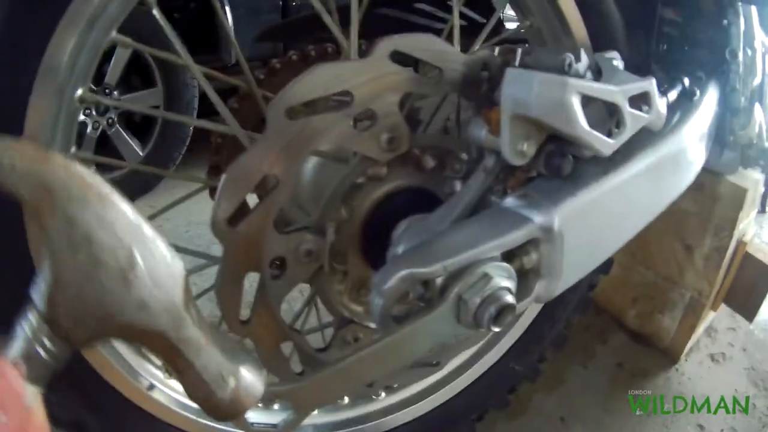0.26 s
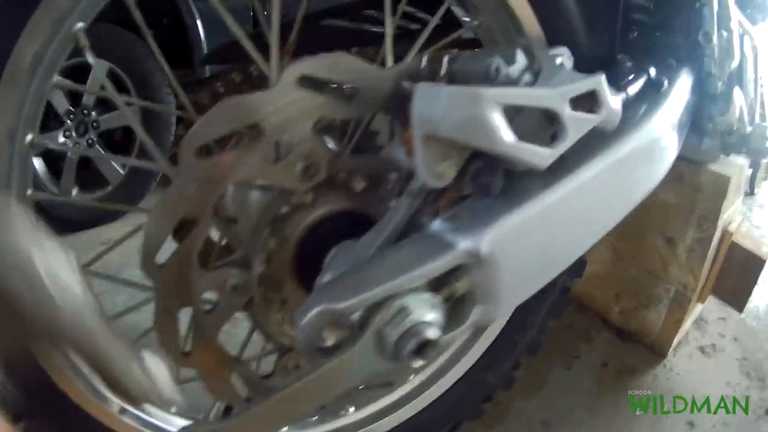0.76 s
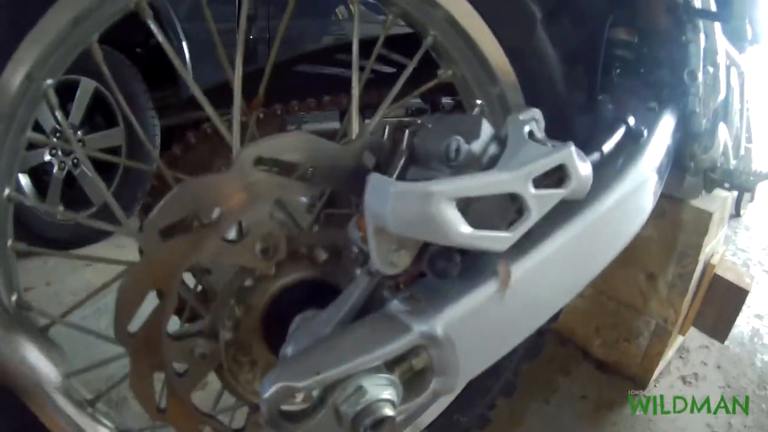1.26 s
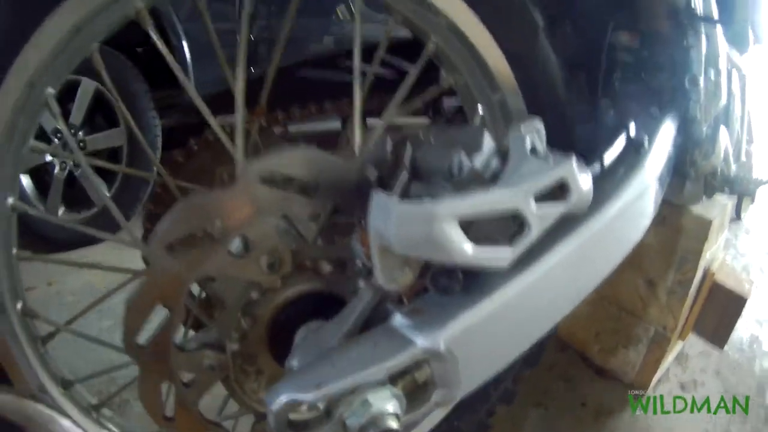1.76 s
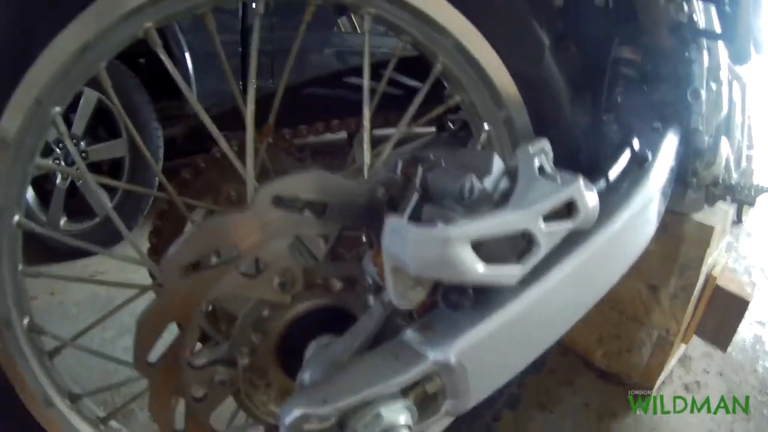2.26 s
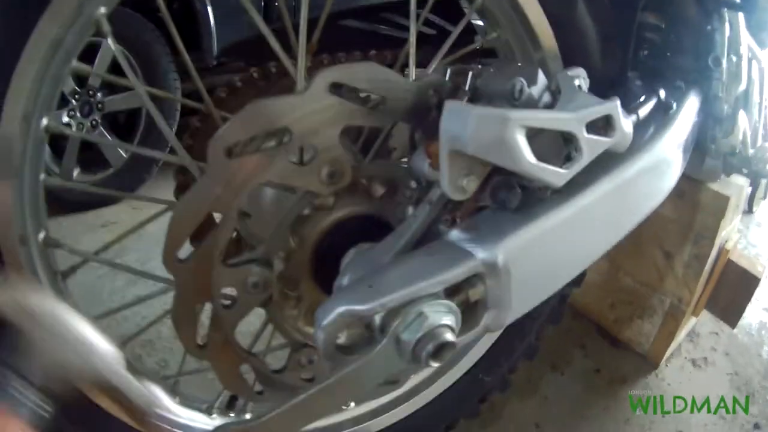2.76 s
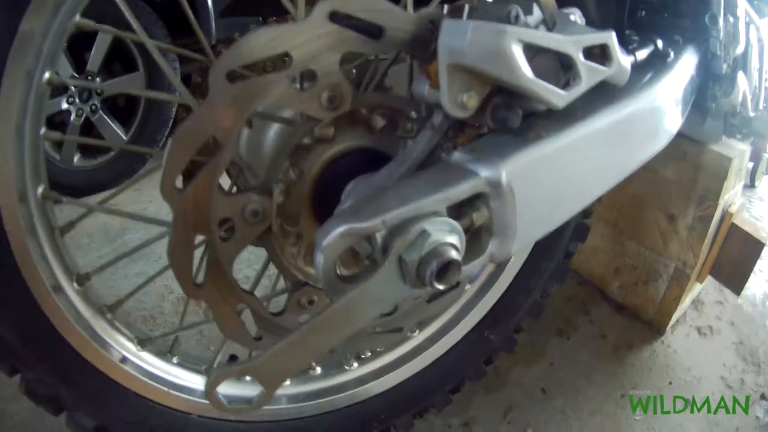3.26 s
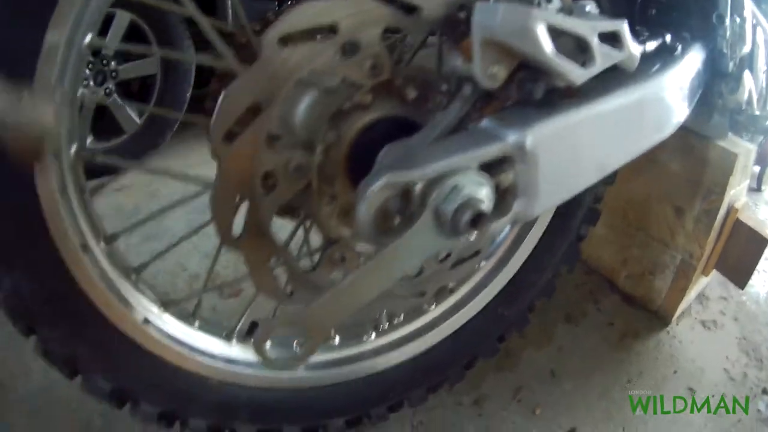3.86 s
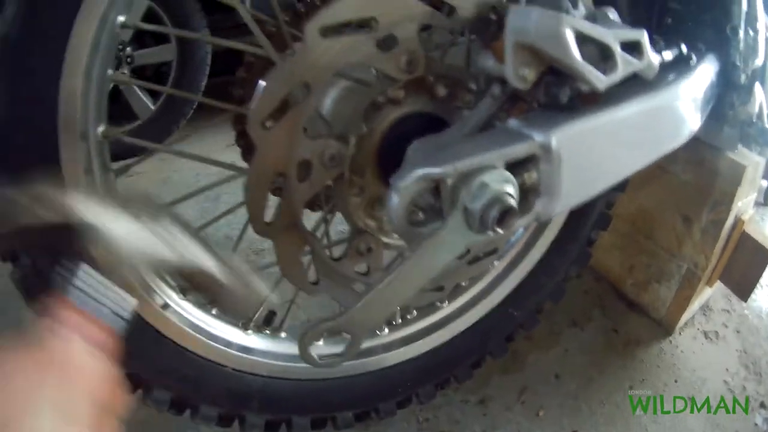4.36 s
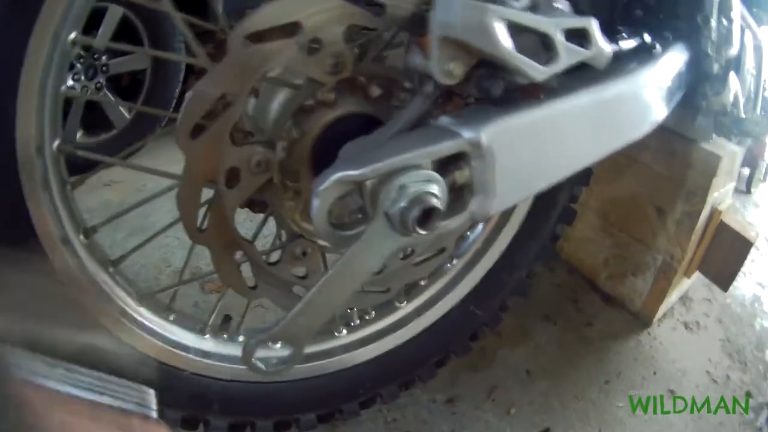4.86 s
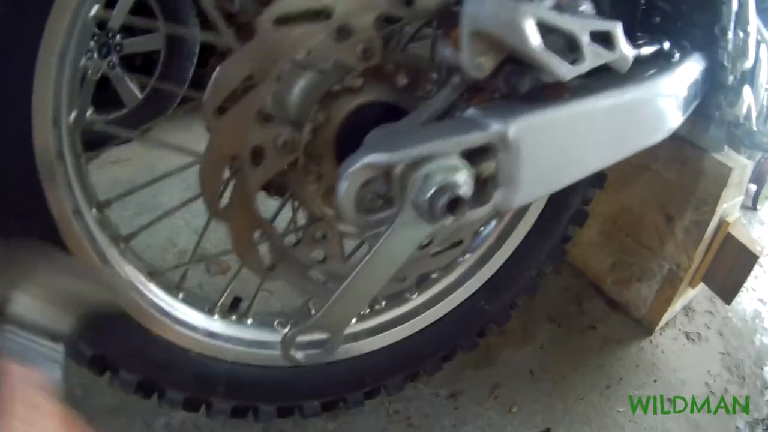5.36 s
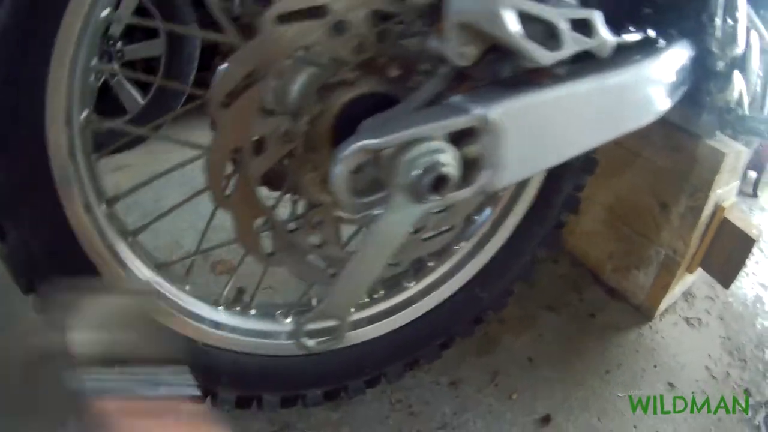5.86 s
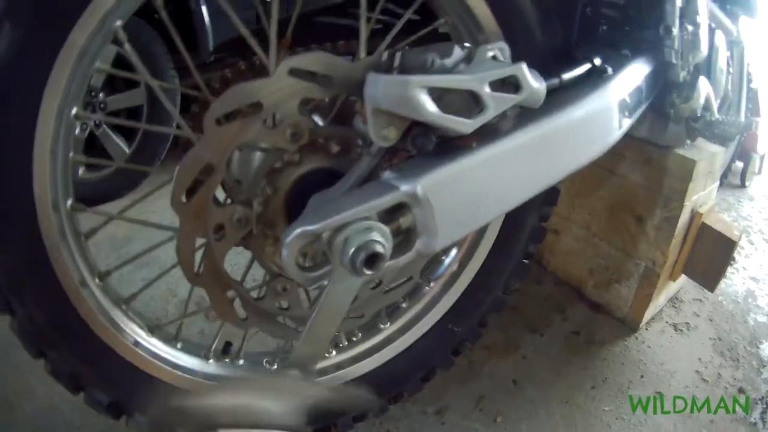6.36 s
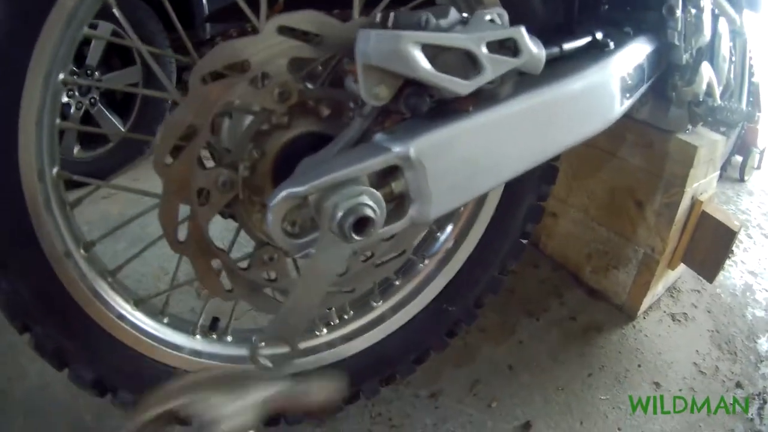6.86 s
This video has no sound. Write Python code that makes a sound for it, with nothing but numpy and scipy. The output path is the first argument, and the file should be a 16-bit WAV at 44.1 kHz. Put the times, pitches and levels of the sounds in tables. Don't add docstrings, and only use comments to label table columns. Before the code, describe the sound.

Faint cloth rustle and quiet garage air, then hammering on steel: first light, soon loud and regular, each blow a sharp clank with a brief ring and hard-walled echo. A small close camera microphone squashes the peaks, so tails hold and then drop. After the last regular blow there is a pause, then a clink, a sliding scrape, another strike and bouncing wrench clatter.

```python
import sys
import numpy as np
from scipy import signal
from scipy.fft import rfft, irfft, next_fast_len
from scipy.io import wavfile
from scipy.ndimage import uniform_filter1d, minimum_filter1d

SR = 44100
rng = np.random.default_rng(int(sys.argv[2]) if len(sys.argv) > 2 else 0)


def put_to_file(sound):
    columns = np.atleast_2d(sound).T
    safe = np.clip(columns, -1, 1)
    whole_steps = np.round(safe * 32767)
    wavfile.write(sys.argv[1], SR, whole_steps.astype(np.int16))


def volts(x):
    e = np.asarray(x, float) / 20
    return 10 ** e


N = 312713


def evened(x):
    return x / np.sqrt(np.mean(x ** 2) + 1e-20)


def read(points, hz):
    f, value = np.transpose(points)
    return np.interp(np.log(hz + 1), np.log(f + 1), value)


def columns(table):
    return np.transpose(table)[:, :, None]


def add(mix, start_s, sound):
    part = mix[round(start_s * SR):][:len(sound)]
    part += sound[:len(part)]


def coloured(spectrum, size):
    white = rfft(rng.standard_normal(size))
    shape = volts(read(spectrum, np.fft.rfftfreq(size, 1 / SR)))
    return evened(irfft(white * shape, size))


def ring(hz, db, t60, t, detune, scatter_db):
    share, shift = rng.standard_normal((2, len(hz), 1))
    level = volts(db + scatter_db * share - 60 * t / t60)
    return (level * np.sin(2 * np.pi * hz * (1 + detune * shift) * t)).sum(0)


# pitch_hz, level_db (per Hz)
AIR = [(15, -30), (40, -8.5), (65, -6), (161, -5), (476, -13), (796, -13), (2840, -29), (9570, -35),
       (12500, -29), (13600, -26.5), (16000, -30)]
# pitch_hz, level_db
WHINE = [(6857, -78), (13714, -64)]


def background():
    t = np.arange(N) / SR
    whine = sum(volts(db) * np.sqrt(2) * np.sin(2 * np.pi * hz * t) for hz, db in WHINE)
    return volts(-50) * coloured(AIR, size=N) + whine


# pitch_hz, t60_s
GARAGE = [(60, 0.23), (500, 0.43), (2000, 0.45), (5000, 0.43), (10000, 0.34), (16000, 0.26)]


def garage(x):
    hz, t, z = signal.stft(rng.standard_normal((3, SR * 3 // 4)), SR, nperseg=256)
    decay = volts(-60 * t / read(GARAGE, hz)[:, None])
    tails = signal.istft(z * decay, SR, nperseg=256)[1]
    tails = tails * (1 - np.exp(-np.arange(tails.shape[1]) / SR / 0.0037))
    turn = np.arange(N) / SR * np.pi - np.arange(3)[:, None] * np.pi / 3
    fed = x * np.cos(turn) * np.sqrt(2 / 3)
    return signal.fftconvolve(fed, tails / np.linalg.norm(tails[0]), axes=1)[:, :N].sum(0)


# pitch_hz, level_db (per Hz)
RUB_COLOUR = [(120, -34), (200, -3), (240, 4), (316, -12), (360, -8), (548, 5.5), (806, 0), (867, 2.5),
              (1450, 1.5), (2210, -3.5), (2420, 3), (3300, -5.5), (4300, -6), (6520, -12), (9750, -4),
              (16000, -13)]
# time_s, level_db
RUBS = [
    [(0.0, -48.5), (0.112, -49), (0.116, -47.5), (0.236, -48.5), (0.24, -48), (0.34, -60)],
    [(6.56, -43), (6.584, -40), (6.696, -39), (6.728, -58), (6.76, -50)],
]


def add_rubs(near):
    for stroke in RUBS:
        s, db = np.transpose(stroke)
        t = np.arange(s[0], s[-1], 1 / SR)
        slips = evened(uniform_filter1d(rng.standard_normal(len(t)), size=120))
        grain = volts(1.6 * slips) * coloured(RUB_COLOUR, size=len(t))
        add(near, s[0], volts(np.interp(t, s, db)) * evened(grain))


# start_s, level_db, pitch_hz
KNOCKS = [
    (6.69, -32, 897),
]


def add_knocks(near):
    t = np.arange(2000) / SR
    for start_s, db, hz in KNOCKS:
        add(near, start_s, volts(db - 60 * t / 0.11) * np.sin(2 * np.pi * hz * t))


# pitch_hz, level_db (per Hz)
CRACK = [(40, -50.5), (120, 3), (450, -37), (780, 4), (1350, -12.5), (2300, -3.5), (2800, -10.5),
         (3150, -16), (3500, -18), (4200, -2), (5400, -5), (8500, -6.5), (11000, -6), (15700, -5.5),
         (16800, -20)]
LOOSE_HZ = [4829, 8005, 9560, 11050, 13310, 14400]
# level_db, t60_s
LOOSE_WRENCH = [(-16.5, 0.1), (-5, 0.084), (2.5, 0.087), (-10.5, 0.1), (-7, 0.18), (-5, .15)]


def clink(db, air_s, low_db, upper_db, top_db):
    t = np.arange(SR // 3) / SR
    share_db, t60 = columns(LOOSE_WRENCH)
    share_db = share_db + np.array([low_db, low_db, 0, upper_db, top_db, top_db])[:, None]
    tone = ring(np.c_[LOOSE_HZ], share_db, t60, t, detune=0.001, scatter_db=0)
    choke_db = -18 * np.clip((t - air_s) / 0.0018, 0, 1)
    tick = np.diff(coloured(CRACK, size=len(t)), prepend=0) * volts(-14 - 60 * t / 0.0098)
    tick = tick + volts(4) * np.roll(tick, round(air_s * SR))
    return volts(db) * (tick + volts(choke_db) * tone)


# start_s, strength_db, low_modes_db, upper_modes_db, top_modes_db
CLINKS = [
    (5.6872, -15, -23.5, 8, 2),
    (6.4452, -6.2, 6.5, 11, -7),
    (6.454, -10, 11.5, 12, 1),
    (6.8374, 4, -5, -23, -21),
    (6.8504, -2.5, 13.5, 12, -9),
    (6.8573, -7.5, 5, 11, 4),
]
# start_s, strength_db
TICKS = [(.674, -14), (1.206, -4), (1.622, -30), (1.761, -41), (2.051, -37), (2.4105, -43), (3.962, -40),
         (4.542, -36), (4.62, -34), (5.265, -28), (5.954, -34), (6.9632, -41)]
# low, upper and top modes, each level_db
TICK_SHARE_DB = [-10, -1, -3]


def add_clinks(near, far):
    starts = np.transpose(CLINKS)[0]
    air_s = np.minimum(np.diff(starts, append=np.inf), 0.0122)
    hops = [(s, db, air, *modes) for (s, db, *modes), air in zip(CLINKS, air_s)]
    ticks = [(s, db, 0.0028, *TICK_SHARE_DB) for s, db in TICKS]
    for start_s, *settings in hops + ticks:
        sound = clink(*settings)
        add(near, start_s, sound)
        add(far, start_s, volts(-3.5) * sound)


# pitch_hz, level_db
WRENCH = [(8150, -12.5), (8750, -44), (9200, 1), (9550, 0.6), (10100, -18.5), (11200, -21), (12700, -32)]
HUB = [(5800, -15.5), (6350, -41.5), (6750, 2.5), (7400, -1.5)]
AXLE = [(3300, -8), (3750, -9.5), (3910, -5.5), (4150, -1.2), (4420, -5), (4950, -17)]
SWINGARM = [(285, -17.5), (390, -19), (600, -9), (690, 3.5), (790, 0.5), (880, -12.5), (960, 2),
            (1080, -7.5)]
DISC = [(1900, -2), (2330, -2.5)]
CALIPER = [(2950, -8), (3160, -.1)]
# usual level_db, then t60_s, then onset_s (how late it speaks)
PART_DB = [-0.5, -4.5, -9.5, -27.5, -18.5, -22.5]
PART_T60 = [.0065, .008, .009, .025, .008, .01]
PART_LATE = [0.000029, 0.00055, 0.0046, 0.014, 0.013, 0.014]
# pitch_hz, level_db, t60_s
RIM = [(777.7, -3, 0.18), (280.3, -15, 0.22), (396.2, -17.5, 0.29)]
# pitch_hz, level_db, t60_s
STAND = [(33.5, -29, 0.18), (42.5, 2.5, 0.49)]


def blow(db, wrench_db, hub_db, arm_db, stand_db, axle_db, spray_db, bump_db, disc_db):
    t = np.arange(SR // 2) / SR
    short = t[:4000]
    chatter = volts(-60 * short / 0.039) * rng.standard_normal(4000) * 0.2
    chatter[0] = 0.4

    crack = signal.lfilter(*signal.butter(2, 9800, fs=SR), coloured(CRACK, size=len(t)))
    near = crack * volts(spray_db - 9.5 - 60 * t / 0.097) * (1 - np.exp(-t / 0.0015))
    crack_shape = evened(volts(read(CRACK, np.fft.rfftfreq(4000, 1 / SR))))
    power = crack_shape ** 2 * volts(2 * (spray_db + 16.5))

    caliper_db = 0.39 * disc_db + 1.3 * min(14 - db, 12)
    parts = WRENCH, HUB, AXLE, SWINGARM, DISC, CALIPER
    drive_db = wrench_db, hub_db, axle_db, arm_db, disc_db, caliper_db
    for modes, t60, late, drive, usual in zip(parts, PART_T60, PART_LATE, drive_db, PART_DB):
        part = volts(drive + usual) * ring(*columns(modes), t60, short, detune=0.009, scatter_db=-2.0)
        onset = 1 - np.exp(-(short + 1e-4) / late)
        add(near, 0, signal.fftconvolve(chatter * onset, part))
        power += abs(volts(5.0) * rfft(part)) ** 2

    rim = volts(arm_db + PART_DB[3]) * ring(*columns(RIM), t, detune=0.006, scatter_db=3.0)
    far = rim.copy()
    add(far, 0, np.roll(irfft(np.sqrt(power)), 200))

    thud = volts(stand_db - 43.5) * ring(*columns(STAND), t, detune=0.02, scatter_db=-3)
    push = t / 0.0028
    thud += volts(bump_db - 11.5) * push * np.exp(1 - push)
    near = near + (rim + thud) * (1 - np.exp(-t / 0.0039))
    return volts(db) * near, volts(db) * far


# swingarm, stand, axle, spray, floor bump, each level_db
TIGHT_DB = [8.3, 2.1, 0.033, 2.4, 2]
FREE_DB = [10.5, -21, 0, 1.3, -18.5]


def shares(start_s, db, square_db, hub_db, disc_db):
    free = start_s > 5.8
    arm_db, stand_db, axle_db, spray_db, bump_db = FREE_DB if free else TIGHT_DB
    soft_db = 14 - db
    arm_db = arm_db + 0.1 * soft_db
    axle_db = axle_db - free * 1.3 * square_db
    bump_db = bump_db + (not free) * 2 * square_db - 0.14 * soft_db
    spray_db = spray_db + 0.1 * disc_db
    return db, square_db, hub_db, arm_db, stand_db, axle_db, spray_db, bump_db, disc_db


# start_s, strength_db, squareness_db (how full the face meets the wrench), hub_clank_db, disc_shake_db
BLOWS = [(0.4485, -11, -2.5, -5, -16), (.646, -0.5, 0.5, -19, 8), (0.8929, 6.5, -4.5, -1, -4),
         (1.1728, 9.5, -5.5, 5, 6), (1.4731, 12.5, -1, 4.5, 8), (1.7886, 15, -3.5, -1.5, -5),
         (2.1239, 14.5, -2.8, -3, -2), (2.4373, 15.5, -2.5, -3, 3), (2.7648, 16, -1.3, -6, -4),
         (3.0901, 15, -1, 0, -7), (3.4058, 16.5, 3, -3.5, -12), (3.711, 15.5, -1.7, -5.5, -2),
         (4.008, 15.5, 0.2, -0.5, -5), (4.3115, 15, 1.1, -20, 7.5), (4.6245, 15.5, -6, -2.5, 11.5),
         (4.9499, 14.5, -2.5, -2, 14), (5.2764, 14.5, -4, -0.3, 12), (5.5962, 14, -0.2, -4.5, 7.5),
         (5.9594, 9, -7.5, -7.5, 15.5), (6.4455, -3.5, 0.5, -0.5, 13.5), (6.8081, 7, -3, -2.5, 6.5)]


def add_blows(near, far):
    for row in BLOWS:
        direct, burst = blow(*shares(*row))
        add(near, row[0], direct)
        add(far, row[0], burst)


def scene():
    near, far = background(), np.zeros(N)
    add_rubs(near)
    add_knocks(near)
    add_clinks(near, far)
    add_blows(near, far)
    return (near + volts(-11.0) * garage(far))[None]


def limiter(dry):
    power_db = 10 * np.log10(abs(signal.lfilter([0.012], [1, 0.012 - 1], dry[0] ** 2)) + 1e-12)
    fall_db = np.arange(N) * 205.0 / SR
    over_db = np.maximum(np.maximum.accumulate(power_db + fall_db) - fall_db + 21.5, 0)
    grip = 0.0071
    ducked = dry / volts(signal.lfilter([grip], [1, grip - 1], 0.58 * over_db))
    swing = abs(signal.hilbert(ducked, next_fast_len(N))[:, :N]) / 0.68 + 1e-9
    return ducked * np.tanh(swing ** 2.5) ** (1 / 2.5) / swing, swing


# pitch_hz, level_db
OVERALL_COLOUR = [(20, -4), (1100, -1.4), (1350, -3.5), (1700, -2.4), (3200, -2.97), (3520, -4), (3800, 0.4),
                  (15700, 2), (16000, -29)]


def overall_colour(held, swing):
    top = signal.oaconvolve(held, signal.firwin(127, 12900, pass_zero=False, fs=SR)[None], "same")
    held = held - top * np.clip(1.6 * uniform_filter1d(np.minimum(swing, 1), size=200), 0, 0.8)
    held = signal.lfilter(*signal.butter(1, 22, "high", fs=SR), held)
    hz = np.linspace(0, SR / 2, 1025)
    colour = signal.firwin2(1023, hz, volts(read(OVERALL_COLOUR, hz)), fs=SR)
    return signal.oaconvolve(held[0], colour, "same")


# pitch_hz, threshold_db (against the neighbouring bands)
MUTE_DB = [(2800, -30), (3300, -3.2), (5000, -3.2), (8500, -5), (10500, -3.5), (12500, -1.2), (15000, -1.5)]


def mute_weak_bands(x):
    hz, _, z = signal.stft(x, SR, nperseg=2048, noverlap=1536)
    power = (abs(z[:1024]) ** 2).reshape(64, 16, -1).mean(1)
    power = uniform_filter1d(power, size=2, axis=1)
    level_db = 10 * np.log10(power + 1e-20)
    under_db = level_db - uniform_filter1d(level_db, size=7, axis=0, mode="nearest")
    total_db = 10 * np.log10(power.sum(0) + 1e-20)
    calm = total_db - minimum_filter1d(total_db, size=7) < 7
    weak = under_db < read(MUTE_DB, hz[8:1024:16])[:, None]
    z[:1024] *= np.repeat(np.where(calm & weak, 0.05, 1.0), 16, axis=0)
    return signal.istft(z, SR, nperseg=2048, noverlap=1536)[1][None, :N]


def band_limit(x):
    return signal.sosfilt(signal.butter(12, 16800, fs=SR, output="sos"), x)


def record(dry):
    held, swing = limiter(dry)
    mix = mute_weak_bands(overall_colour(held, swing))
    return band_limit(mix)


dry = scene()
out = record(dry)
put_to_file(out)
```